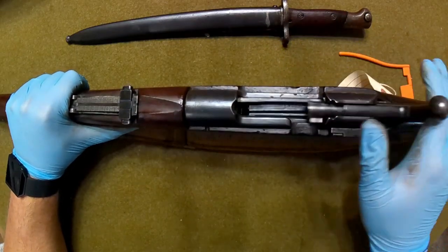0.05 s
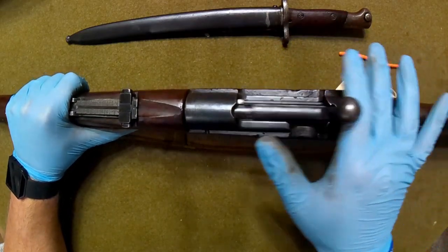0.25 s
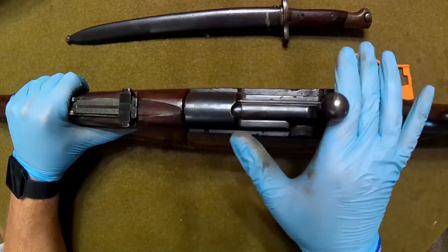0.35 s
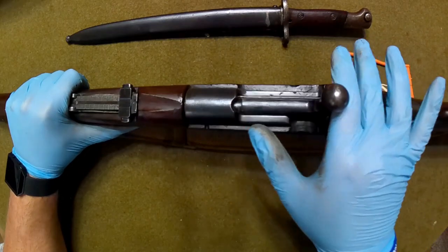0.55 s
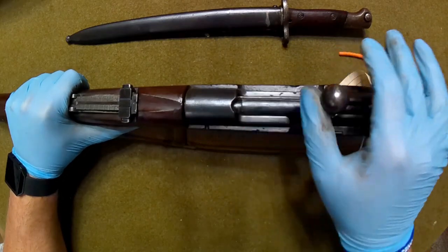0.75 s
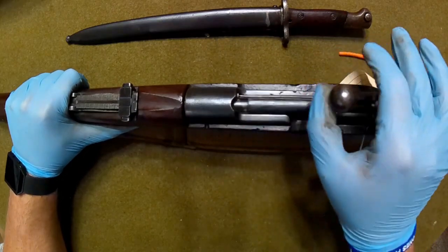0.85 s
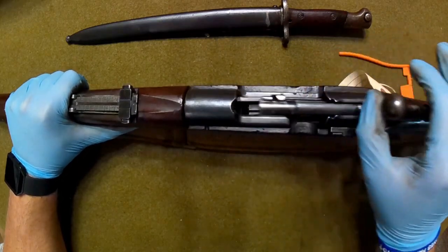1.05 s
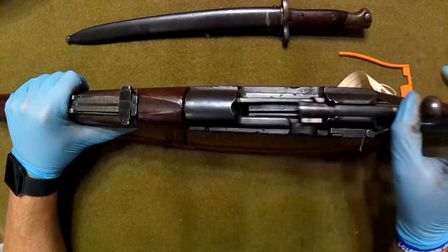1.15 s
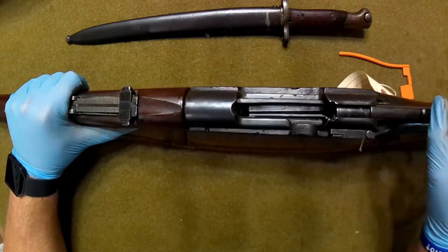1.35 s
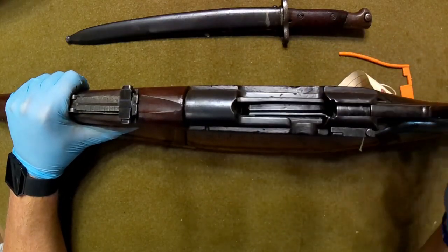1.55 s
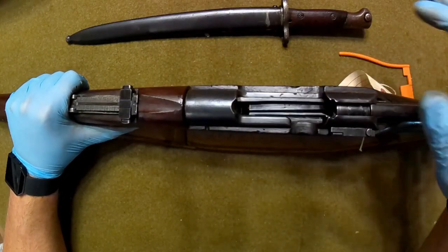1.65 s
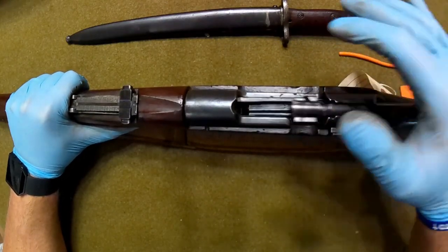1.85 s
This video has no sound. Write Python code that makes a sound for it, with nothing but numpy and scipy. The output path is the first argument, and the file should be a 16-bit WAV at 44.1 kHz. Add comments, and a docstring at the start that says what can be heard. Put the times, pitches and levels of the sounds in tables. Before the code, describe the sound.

A rifle bolt is worked open and shut with sharp, close metallic clicks and clacks.

```python
"""In a small room, a rifle bolt is worked by hand on a cloth-covered table, close to the microphone. The handle
lifts and the bolt slides back against its stop; later it is pushed home and turned down, and the gloved hand
shifts its grip and knocks against the stock. Every contact is a crack of noise with a short ring of steel;
sliding adds a faint rub. The table thumps and the room answers over a low rumble."""
import sys
import numpy as np
from scipy import signal
from scipy.fft import rfft, irfft, next_fast_len
from scipy.io import wavfile
from scipy.ndimage import uniform_filter1d

SR = 44100
rng = np.random.default_rng(int(sys.argv[2]) if len(sys.argv) > 2 else 0)


def dump(signal):
    """Clip the signal to [-1, 1] and save it as 16-bit WAV at the path in sys.argv[1]."""
    limited = np.clip(np.atleast_2d(signal).T, -1, 1)
    pcm = np.round(limited * 32767).astype(np.int16)
    wavfile.write(sys.argv[1], SR, pcm)


N = 83790


def undb(db):
    """Decibels to gain."""
    return 10 ** (np.asarray(db) / 20)


def unit(x):
    """Scale to rms 1."""
    return x / np.sqrt(np.mean(x ** 2) + 1e-20)


def lookup(hz, points):
    """Read (Hz, value) points on a log-frequency axis."""
    p = np.array(points)
    return np.interp(np.log(np.maximum(hz, 1)), np.log(p[:, 0]), p[:, 1])


def colour(x, points):
    """Minimum-phase EQ through (Hz, dB) points, so nothing rings ahead of an attack."""
    size = 2 * next_fast_len(len(x))
    gain = undb(lookup(np.fft.rfftfreq(size, 1 / SR), points))
    cepstrum = irfft(np.log(gain))
    cepstrum[1:size // 2] *= 2
    cepstrum[size // 2 + 1:] = 0
    return irfft(rfft(x, size) * np.exp(rfft(cepstrum)))[:len(x)]


def band(x, lo, hi, order=3):
    """Band-pass between two edges in Hz."""
    return signal.sosfilt(signal.butter(order, [lo, hi], "band", fs=SR, output="sos"), x)


def fade(t, t60):
    """Exponential decay, 60 dB down after t60."""
    return np.exp(-np.log(1000) * t / max(t60, 1e-3))


def add(out, start, x):
    """Mix x into out at a time in seconds."""
    i = max(int(start * SR), 0)
    out[i:i + len(x)] += x[:max(len(out) - i, 0)]


def burst(envelope, smooth_hz=30):
    """Broadband noise under an envelope, with the chance peaks in its spectrum levelled out."""
    root = np.sqrt(envelope)  # applied before and after the levelling
    noise = rng.standard_normal(len(envelope)) * root
    spectrum = rfft(noise)
    bins = max(int(smooth_hz * len(noise) / SR), 2)
    local_level = np.sqrt(uniform_filter1d(np.abs(spectrum) ** 2, size=bins) + 1e-12)
    return unit(irfft(spectrum / local_level, len(noise))) * np.std(noise) * root


def background(floor_db=-55, hum_hz=68.5, hum_db=-62, waver_db=1):
    """Room tone: low rumble, a wavering hum and faint hiss."""
    # Colour of the rumble and hiss. Each row: frequency in Hz, gain in dB.
    floor_eq = [(15, -40), (25, 2), (45, -9.5), (66, -3), (100, -11), (230, -8.5), (270, -17), (340, -9.5),
                (420, -19.5), (700, -20), (1000, -26.5), (1950, -33.5), (3720, -36), (8000, -41),
                (15500, -44)]
    waver = unit(band(rng.standard_normal(N + SR), 0.89, 11, order=2)[SR:])
    hum = np.sqrt(2) * undb(hum_db - waver_db * waver) * np.sin(2 * np.pi * hum_hz * np.arange(N) / SR)
    floor = unit(colour(rng.standard_normal(N + SR), floor_eq)[SR:])
    return hum + undb(floor_db) * floor


def room(x, predelay_s=0.009, build_s=0.0013):
    """Dense, short reflections of a small room, dying soonest in the low mids."""
    # Colour of the reflections. Each row: frequency in Hz, gain in dB.
    tail_eq = [(100, -8), (250, -1.5), (600, -2.5), (1300, -10), (2600, -11), (5000, -14), (10000, -16),
               (15000, -10)]
    # Decay of the room. Each row: frequency in Hz, t60 in seconds.
    decay_times = [(100, .22), (300, 0.067), (700, 0.11), (1800, 0.2), (5000, 0.22), (13000, .16)]
    t = np.arange(SR // 2) / SR
    build = np.clip((t - predelay_s) / build_s, 0, 1)
    edges_hz = np.geomspace(80, 16000, 12)
    tail = 0
    for lo, hi in zip(edges_hz, edges_hz[1:]):
        t60 = lookup(np.sqrt(lo * hi), decay_times)
        echoes = band(burst(build * fade(t, t60)), lo, hi)
        tail = tail + unit(echoes) * np.sqrt(2 * (hi - lo) / SR / len(t))  # equal energy per Hz
    return signal.fftconvolve(x, colour(tail, tail_eq))[:N]


def friction(strokes, eq, rough_db=6):
    """Strokes of coloured noise that flutter in level as the surfaces catch and slip."""
    out = np.zeros(N)
    for start, length, db in strokes:
        size = int(length * SR)
        grip = np.tanh(unit(uniform_filter1d(rng.standard_normal(N), size=200)))[:size]
        rub = unit(colour(rng.standard_normal(N), eq))[:size]
        add(out, start, undb(db + rough_db * grip) * rub * signal.windows.tukey(size, .5))
    return out


def glove_brush():
    """The glove brushes the metal with a faint, bright swish."""
    # Strokes of the glove. Each row: start in seconds, length in seconds, level in dB.
    strokes = [(1.66, .1, -74)]
    # Colour of glove on steel. Each row: frequency in Hz, gain in dB.
    glove_eq = [(500, -10), (3500, -11), (5700, 0), (7500, -11), (10500, -8), (15000, -18)]
    return friction(strokes, glove_eq)


def bolt_slides():
    """The bolt slides in its race with a dull, uneven rub."""
    # Travel of the bolt. Each row: start in seconds, length in seconds, level in dB.
    strokes = [(.06, 0.1, -60), (.205, 0.078, -48), (.76, 0.17, -65), (.83, 0.12, -53.5),
               (.985, 0.068, -56), (1.1, 0.12, -63.5), (1.2, 0.064, -55), (1.808, 0.086, -61)]
    # Colour of steel on steel. Each row: frequency in Hz, gain in dB.
    steel_eq = [(300, 10), (1200, 4), (2600, -3), (3800, -8.5), (6000, -10.5), (8000, -23), (15000, -28.5)]
    return friction(strokes, steel_eq)


def table_thumps(rise_s=0.012):
    """The harder pushes go through stock and cloth into the table, which booms softly."""
    # Pushes on the table. Each row: start in seconds, low mode level in dB, knock mode level in dB.
    pushes = [(.1, -60, -43), (0.239, -43, -50.5), (0.302, -38, -34.5), (.895, -40, -59),
              (1.011, -46, -38.5), (1.185, -34, -45), (1.289, -27.5, -42), (1.809, -43, -40)]
    # The table's low mode and knock mode. Each row: frequency in Hz, t60 in seconds.
    modes = [(139, 0.26), (388, 0.25)]
    out, t = np.zeros(N), np.arange(SR // 2) / SR
    for start, *levels_db in pushes:
        boom = sum(undb(db) * fade(t, t60) * np.sin(2 * np.pi * hz * t)
                   for db, (hz, t60) in zip(levels_db, modes))
        add(out, start, boom * np.minimum(t / rise_s, 1))
    return out


def contact(part, levels_db, ring_db, attack_s=0.00045, hold_s=0.0014, crack_db=1.5, crack_t60_s=0.03):
    """One blow cracks and rings the steel; where and how hard it lands sets each band's level."""
    # Modes of the free bolt, and of the receiver with the bolt seated in it.
    # Each row: frequency in Hz, relative level in dB, t60 in seconds.
    modes_of = { "bolt": [(706, -1.5, 0.12), (863, -7, .03), (1080, 0, 0.0073), (1308, 3.5, .025),
                (1850, 3, .035), (2517, -13, 0.027), (3607, 0.5, 0.018), (3830, -12, 0.06),
                (4100, -31, .02), (5480, -6, .028), (5855, -2.5, .02), (6640, -11.5, 0.011),
                (8210, -13.5, 0.027), (9970, -12.5, 0.024), (10650, -14.5, 0.038)],
                "receiver": [(540, -20.5, 0.013), (828, -6.5, 0.051), (1023, -5.5, .03), (1312, 3, .026),
                (1435, -1, 0.016), (1946, -14.5, 0.075), (3076, -3, .02), (3530, -2, 0.028),
                (4094, -5, .02), (4820, -12, 0.04), (5450, -1.5, 0.0073), (6110, -10, .02),
                (7240, -12.5, 0.01), (7970, -15.5, 0.015), (10200, -11, 0.026), (10720, -15, .02)]}
    # Colour of the crack. Each row: frequency in Hz, gain in dB.
    crack_eq = [(100, -7), (400, -5.5), (1200, 6.5), (1900, 3), (2500, -7), (3700, -9), (5700, -5.5),
                (7000, -9.5), (9200, -12.5), (11000, -7.5), (12500, -24), (16000, -31)]
    # Edges of the six bands in Hz, from bass to top.
    edges_hz = [100, 500, 1000, 2400, 4500, 7500, 15500]
    # How strongly each band radiates, as a trim in dB.
    trims_db = [-7, -3.5, -5.5, -4.5, -5, -7.5]
    t = np.arange(SR // 8) / SR
    rise = np.minimum(t / attack_s, 1)
    after_hold = np.maximum(t - hold_s, 0)
    ring = rise * sum(undb(db + ring_db) * fade(after_hold, t60)
                      * np.sin(2 * np.pi * (hz * t + rng.random())) for hz, db, t60 in modes_of[part])
    shelf_db = 5 if part == "receiver" else 0  # the rigid receiver cracks brighter at the very top
    part_eq = [(hz, db + np.interp(hz, [11000, 13000], [0, shelf_db])) for hz, db in crack_eq]
    envelope = rise * fade(after_hold, crack_t60_s)
    crack = undb(crack_db) * unit(colour(burst(envelope), part_eq)) * np.std(envelope)
    blow = sum(undb(db + trim) * unit(band(ring + crack, lo, hi))
               for db, trim, lo, hi in zip(levels_db, trims_db, edges_hz, edges_hz[1:]))
    return blow * np.sqrt(.01 / t[-1])  # each band carries the energy of 10 ms at its level


def bolt_clicks(ring_db=0):
    """The clicks and clacks of the action, with the hand's knocks on the stock; ring_db sets the steel's ring
    against its crack."""
    # Blows in the action, plus the softer knocks of the hand on the stock (near 0.11-0.13 s, 1.19 s and
    # 1.73-1.88 s), # which take the receiver's ring; the faint row at 1.131 s is a catch as the bolt slides. #
    # Each row: start in seconds, part that rings, # then six band levels in dB before trim, from bass to top.
    blows = [ (0.0263, "bolt", -61, -53.5, -42.5, -53, -57, -61),
             (0.0983, "bolt", -52, -80, -67, -69, -52, -63),
             (0.1139, "receiver", -53, -38, -40, -57.5, -60, -67),
             (.125, "receiver", -42.5, -50, -45, -65, -66, -71),
             (0.202, "bolt", -40, -41.5, -40.5, -44, -51, -61),
             (0.2205, "bolt", -56, -56, -52, -53, -65.5, -75),
             (.237, "bolt", -41, -27.5, -26.5, -36.5, -37, -43),
             (0.2475, "bolt", -45, -42, -33, -40.5, -38.5, -48),
             (0.2528, "bolt", -41, -34, -28.5, -39.5, -41.5, -52),
             (0.3031, "bolt", -30.5, -19.5, -14.5, -21.5, -21, -26),
             (0.852, "bolt", -73, -43, -37.5, -38, -39.5, -51),
             (0.8611, "bolt", -48, -33, -32.5, -70, -50, -61),
             (0.8987, "bolt", -41.5, -47, -41.5, -50.5, -49, -69),
             (1.0081, "bolt", -38.5, -35, -30, -39.5, -47.5, -56.5),
             (1.131, "receiver", -51, -68, -53, -74, -69, -78),
             (1.1854, "receiver", -38.5, -29, -31, -40.5, -41, -56),
             (1.1917, "receiver", -42, -31.5, -28, -39.5, -43, -54),
             (1.225, "receiver", -37.5, -50, -39, -54.5, -49.5, -63),
             (1.268, "receiver", -48, -38, -37, -63, -66, -63),
             (1.2886, "receiver", -31.5, -26.5, -17, -24, -19.5, -27),
             (1.4422, "receiver", -58, -59, -59.5, -70, -56, -53.5),
             (1.7268, "receiver", -44.5, -45.5, -47.5, -63, -67, -74),
             (1.7766, "receiver", -49, -48, -42, -52, -52.5, -50),
             (1.81, "receiver", -47, -37.5, -46, -54.5, -57.5, -71),
             (1.8208, "receiver", -39, -37, -39.5, -57, -62.5, -69),
             (1.8437, "bolt", -61, -60, -61, -60, -53.5, -62),
             (1.861, "receiver", -45, -39.5, -39, -54.5, -54.5, -71),
             (1.876, "receiver", -39, -42, -44.5, -53.5, -62, -71)]
    out = np.zeros(N)
    for start, part, *levels_db in blows:
        add(out, start, contact(part, levels_db, ring_db))
    return out


def scene():
    """The close rifle and the table, with the room's reflections and room tone, in mono."""
    rub = bolt_slides() + glove_brush()
    direct = bolt_clicks() + rub + table_thumps()
    room_send = bolt_clicks(ring_db=-15) + rub  # less ring in the sound that spreads into the room
    return (direct + room(room_send) + background())[None]


def record(dry, top_hz=15800):
    """The recorder cuts the top with a steep low-pass."""
    return signal.sosfilt(signal.ellip(8, .2, 70, top_hz, fs=SR, output="sos"), dry)


dry = scene()
out = record(dry)
dump(out)
```